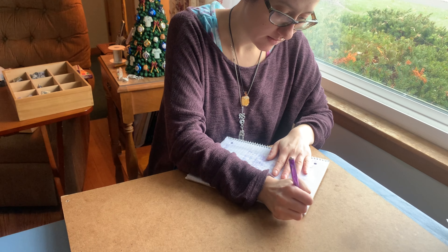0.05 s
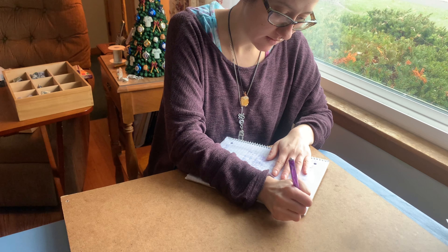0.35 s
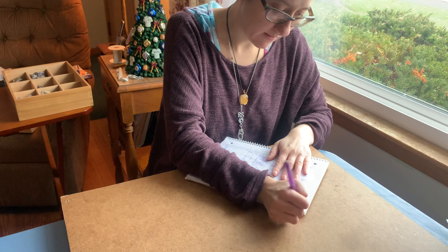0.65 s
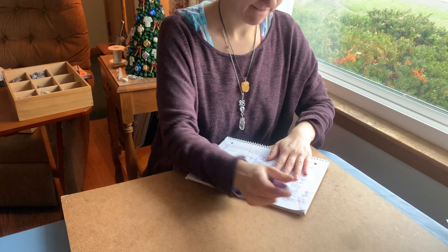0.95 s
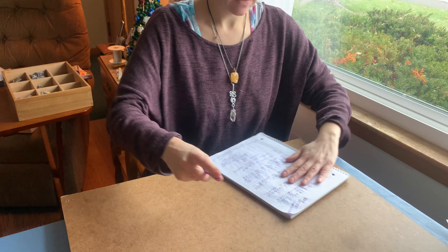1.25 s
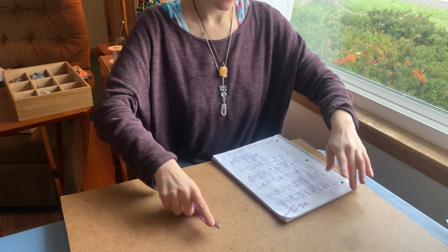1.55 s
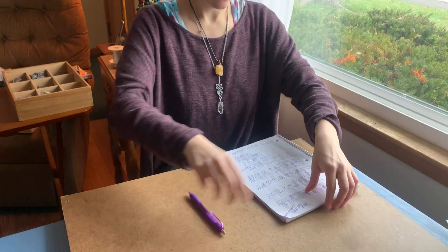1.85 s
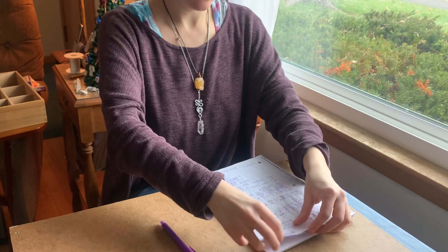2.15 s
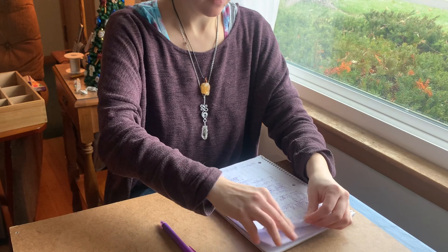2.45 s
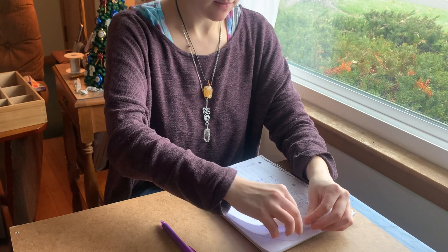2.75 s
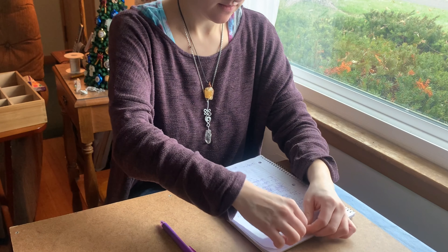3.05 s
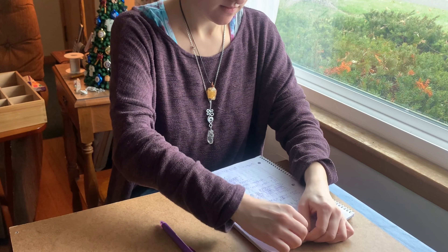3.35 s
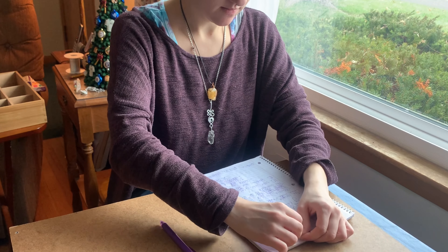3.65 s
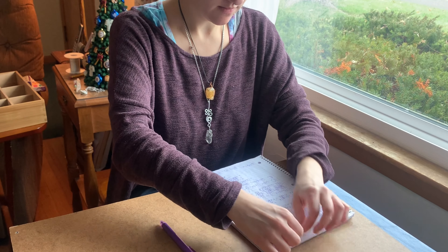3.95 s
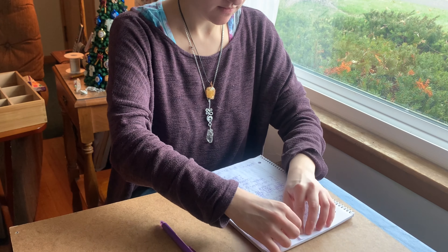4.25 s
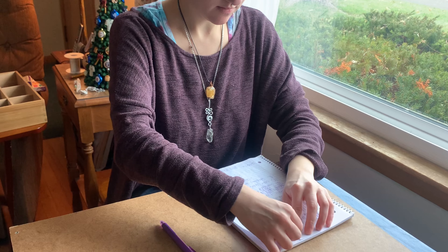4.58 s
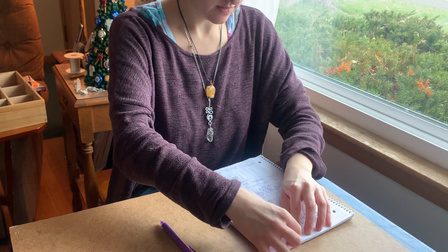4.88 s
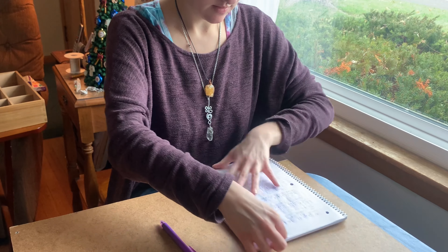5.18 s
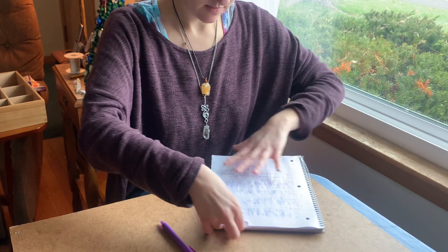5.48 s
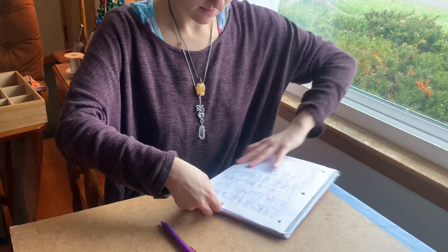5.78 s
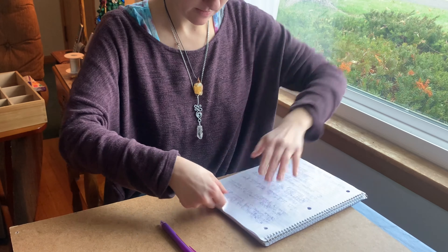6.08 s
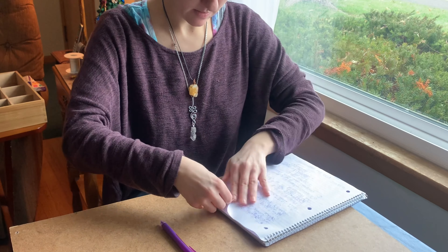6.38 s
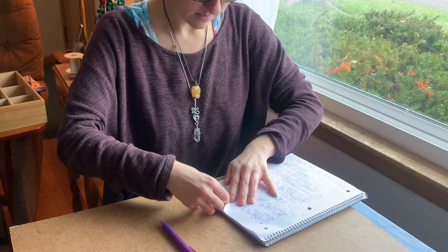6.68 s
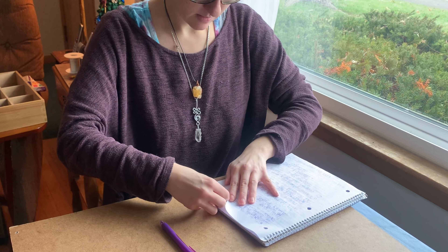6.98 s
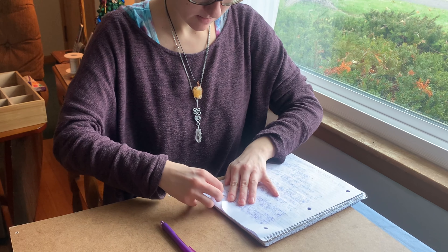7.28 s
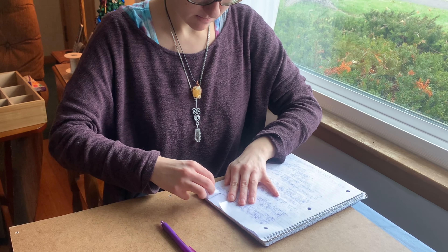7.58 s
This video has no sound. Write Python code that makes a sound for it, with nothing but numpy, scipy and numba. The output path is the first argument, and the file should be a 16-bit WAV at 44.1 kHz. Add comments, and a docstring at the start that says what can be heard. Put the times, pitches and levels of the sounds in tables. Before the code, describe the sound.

A hand swishes over paper and a pen clatters down on wood, followed by light crinkling, a sliding notebook and small, hesitant rips.

```python
"""Spiral notebook on a wooden table

In a quiet room, fingertips tap and brush the page and a hand swishes over it. Something like a pen
clicks, then clatters down and rings the table top. The sheet is picked at and crinkled, the notebook
is slid round, and the sheet is torn a little at a time. Rubbing, buckling and tearing are noise driven
by random slips; snaps, clicks and knocks are short, shaped bursts of noise."""
import sys
import numpy as np
from scipy import signal
from scipy.fft import rfft, irfft
from scipy.io import wavfile
from numba import njit

SR = 44100
rng = np.random.default_rng(int(sys.argv[2]) if len(sys.argv) > 2 else 0)


def file_out(sig):
    """Save sig as 16-bit WAV at sys.argv[1]."""
    # one column per channel
    cols = np.atleast_2d(sig).T
    # limit, then scale
    lim = np.clip(cols, -1, 1)
    pcm = np.round(lim * 32767).astype(np.int16)
    wavfile.write(sys.argv[1], SR, pcm)


N = 336483
TIME = np.arange(N) / SR


def from_db(db):
    """Decibels to gain."""
    return 10 ** (np.asarray(db) / 20)


def rms_one(x):
    """Scale to unit power."""
    return x / np.sqrt(np.mean(x ** 2) + 1e-20)


def to_peak(x, db):
    """Scale the highest crest to db."""
    return from_db(db) * x / np.abs(x).max()


def at_hz(points, hz):
    """Read a table on a log-frequency axis."""
    knots, values = np.transpose(points)
    return np.interp(np.log(np.maximum(hz, 1)), np.log(knots), values)


def band(x, low_hz, high_hz, order=3):
    """Butterworth band-pass."""
    sos = signal.butter(order, [low_hz, min(high_hz, .47 * SR)], "band", fs=SR, output="sos")
    return signal.sosfilt(sos, x + 1e-18)


def colour(x, points, size=4096):
    """Minimum-phase filter with the given (Hz, dB) spectrum."""
    hz = np.arange(size // 2 + 1) * SR / size
    cepstrum = irfft(np.log(from_db(at_hz(points, hz))))
    cepstrum[1:size // 2] *= 2
    cepstrum[size // 2 + 1:] = 0
    return signal.fftconvolve(x, irfft(np.exp(rfft(cepstrum))))[:len(x)]


@njit
def resonate(x, hz, width_hz):
    """Unity-gain resonance with a moving centre."""
    out, r = np.zeros(len(x)), np.exp(-np.pi * width_hz / SR)
    for i in range(2, len(x)):
        drive = (1 - r * r) / 2 * (x[i] - x[i - 2])
        out[i] = drive + 2 * r * np.cos(2 * np.pi * hz[i] / SR) * out[i - 1] - r * r * out[i - 2]
    return out


def drift(per_s):
    """Smooth random wander, spread about 1."""
    knots = rng.standard_normal(N // 20)
    return np.interp(TIME * per_s, np.arange(len(knots)), knots)


def add(out, start_s, piece):
    """Mix a short sound in at start_s."""
    start = max(round(start_s * SR), 0)
    out[start:start + len(piece)] += piece[:N - start]


def burst(crack_s, ring_s, ring_db, rise_s, size=4000):
    """A sudden release of tiny clicks: noise with a fast decay plus a longer shiver."""
    t = np.arange(size) / SR
    decay = np.exp(-t / crack_s) + from_db(ring_db) * np.exp(-t / ring_s)
    return rng.standard_normal(size) * (1 - np.exp(-t / rise_s)) * decay


def slips(per_s, spread_db, slip_s, hiss_share):
    """Random slips of uneven size, each a brief shower of ticks, over steady hiss."""
    sizes = from_db(spread_db * np.minimum(rng.exponential(1, N), 2.6))
    impulses = (rng.random(N) < per_s / SR) * sizes
    power = signal.lfilter([1], [1, -np.exp(-2 / (slip_s * SR))], impulses ** 2 + 1e-18)
    return rng.standard_normal(N) * np.sqrt(power / power.mean() + hiss_share)


def facets(x, patchy_db, per_s):
    """The facets of a bending sheet favour now one band, now another."""
    edges_hz = np.geomspace(400, 18000, 15)
    return sum(band(x, low, high, order=2) * from_db(patchy_db * drift(per_s)) * (-1) ** k
               for k, (low, high) in enumerate(zip(edges_hz, edges_hz[1:])))


def air_pocket(x, glide, width_hz, lift_db):
    """Trapped air adds a hollow ring that glides as the gap changes."""
    hz = np.interp(TIME, *np.transpose(glide))
    return x + from_db(lift_db) * resonate(x, hz, float(width_hz))


# Zones of the sheet: flex, body, fibre ticks. Each row: low edge in Hz, high edge in Hz.
ZONES_HZ = [(500, 2200), (2200, 6500), (6500, 17000)]

def zoned(x, gains):
    """Split into three zones of unit power and mix them by gains."""
    return sum(gain * rms_one(band(x, low, high)) for gain, (low, high) in zip(gains, ZONES_HZ))


def balance(bright_db, flex_db, trade):
    """Zone gains. Brightness is ticks over body; trade times that comes off the flex."""
    return from_db([flex_db - trade * bright_db, 0 * bright_db, bright_db])


def stroke(start_s, length_s, rise_s, release_s, sag_db_per_s):
    """Envelope of one hand movement: swell, sag, release."""
    t = TIME - start_s
    swell = np.sin(np.pi / 2 * np.clip(t / rise_s, 0, 1)) ** 2
    sag = from_db(-sag_db_per_s * np.clip(t - rise_s, 0, length_s))
    release = np.exp(-np.clip((t - length_s) / release_s, 0, 20))
    return swell * sag * release


def pulls(rows, flex_db, trade, **shape):
    """Zone gains over time for a run of short efforts on the sheet; their powers add."""
    power = 0
    for start_s, length_s, db, bright_db in rows:
        level = from_db(db) * stroke(start_s, length_s, **shape)
        power = power + (balance(bright_db, flex_db, trade)[:, None] * level) ** 2
    return np.sqrt(power)


# Finger squeezes. Each row: start in s, length in s, relative level in dB, brightness in dB.
SQUEEZES = [(2.505, 0.13, -59, -13), (2.64, 0.16, -59, -6.5), (2.82, 0.088, -59, -11.5),
            (2.94, 0.11, -61, -14), (3.14, 0.11, -66, -20), (3.28, 0.052, -63.5, 3),
            (3.43, 0.051, -60.5, 13.5), (3.49, 0.053, -56, -4), (3.55, 0.12, -54, 0.5),
            (3.68, 0.058, -66.5, -19), (3.768, 0.032, -56, -3), (3.83, 0.014, -62, -9),
            (3.91, 0.035, -71.5, -19), (4.02, 0.058, -66, -12), (4.075, 0.1, -47.5, -2),
            (4.2, 0.063, -58, -6), (4.3, 0.048, -66, -14), (4.43, 0.016, -64, -13), (4.515, .11, -62, 1.5),
            (4.67, .04, -60.5, -2), (4.715, 0.042, -54.5, 1.5), (4.78, 0.1, -63.5, -2),
            (4.965, 0.014, -68.5, -46)]
# Buckling paper. Each row: frequency in Hz, gain in dB.
CRINKLE_EQ = [(400, -11.5), (950, -7), (1250, -7.5), (1800, -5), (2800, 1.5), (3900, 6), (4900, 4.5),
              (5700, -1), (7400, -6.5), (9700, -5), (12000, -8), (14500, -1.5), (16000, -19.5)]

def crinkling():
    """The squeezed sheet buckles in sparse, uneven slips."""
    crackle = slips(per_s=260, spread_db=4, slip_s=0.0013, hiss_share=0.3)
    crackle = facets(crackle, patchy_db=2.8, per_s=60)
    effort = pulls(SQUEEZES, flex_db=-11.5, trade=0.36, rise_s=0.0077, release_s=0.012,
                   sag_db_per_s=13.5)
    return from_db(2.13) * zoned(colour(crackle, CRINKLE_EQ), effort)


# Each row: start in s, relative peak in dB, brightness in dB.
PAPER_TICKS = [(0.183, -54, 8), (0.347, -48.5, 9), (0.514, -46, 9), (0.53, -45.5, -1.5), (0.546, -47, 7),
               (0.79, -45.5, 14), (2.091, -52, -9), (2.365, -36, -9.5), (2.596, -42, -31),
               (2.635, -33.5, -7), (2.725, -29, -8), (3.059, -20.5, -9), (3.147, -42.5, -18),
               (3.192, -33.5, -11), (3.254, -33, -16), (3.272, -36.5, -6), (3.325, -31, 2.5),
               (3.433, -37.5, 10), (3.468, -34.5, 3), (3.498, -42.5, -10), (3.557, -33, 0),
               (3.636, -35, -6), (4.003, -51, -11.5), (4.053, -37, -11), (4.081, -43.5, -34),
               (4.312, -48, -12), (4.672, -43.5, -2), (5.264, -32, -8.5), (5.301, -33.5, -1),
               (5.605, -41.5, -15), (6.417, -36.5, 16), (6.431, -32, 6), (6.471, -40, 9),
               (7.069, -29.5, -1.5), (7.17, -32, 3.5), (7.375, -44, -4)]

def paper_ticks():
    """Light finger taps on the page, then sharp paper snaps, some dull, some bright."""
    out = np.zeros(N)
    for start_s, peak_db, bright_db in PAPER_TICKS:
        tick = burst(crack_s=0.0015, ring_s=0.0029, ring_db=4.5, rise_s=0.00062)
        tick = zoned(colour(tick, CRINKLE_EQ), balance(bright_db, flex_db=-12.5, trade=0.62))
        add(out, start_s + 0.0004, to_peak(tick, peak_db))
    return from_db(3.2) * out


# Each row: start in s, length in s, relative level in dB, brightness in dB.
TEAR_PULLS = [(6.268, 0.11, -59.5, 5), (6.395, 0.037, -56, 3), (6.47, 0.086, -56, -2),
              (6.635, 0.024, -63.5, -4), (6.735, 0.086, -68, 0), (6.85, .07, -63, 3),
              (6.95, 0.099, -63, -6.5), (7.015, 0.21, -55.5, -8.5), (7.095, 0.055, -47, -5),
              (7.175, 0.064, -54, -3.5), (7.25, .14, -50.5, -2), (7.4, 0.28, -53, -4.5),
              (7.585, 0.059, -51.5, -3)]
# Parting fibres. Each row: frequency in Hz, gain in dB.
TEAR_EQ = [(500, -15), (960, -15), (1200, 2.5), (2300, -6.5), (2900, -1), (4300, 1.5), (4650, -3.5),
           (5000, 4), (5600, -4.5), (6400, -0.5), (7200, -7), (10000, -7), (14000, -5), (16000, -14)]
# Air pocket under the sheet. Each row: time in s, pitch in Hz.
TEAR_GLIDE = [(6.3, 3200), (7.0, 4040), (7.15, 4170), (7.3, 3060), (7.45, 2930), (7.63, 2120)]
# Loose flap. Each row: ratio to the pocket's pitch, gain in dB.
FLAP_MODES = [(.53, -2), (.8, -13), (1.25, -1)]

def tearing():
    """Fibres part in uneven runs; air pocket and flap ring hollow, rising, then sinking in pitch."""
    rasp = slips(per_s=300, spread_db=3.6, slip_s=0.0016, hiss_share=0.3)
    rasp = facets(rasp, patchy_db=2.2, per_s=35)
    pocket_hz = np.interp(TIME, *np.transpose(TEAR_GLIDE))
    flap = sum(from_db(db) * resonate(rasp, ratio * pocket_hz, width_hz=70.0)
               for ratio, db in FLAP_MODES)
    hollow = air_pocket(colour(rasp, TEAR_EQ), TEAR_GLIDE, width_hz=150, lift_db=3)
    effort = pulls(TEAR_PULLS, flex_db=-19.5, trade=0.66, rise_s=0.01, release_s=0.015, sag_db_per_s=22)
    return from_db(1.3) * zoned(hollow + flap, effort)


# Each row: start in s, rise in s, length in s, body level in dB, initial brightness in dB.
HAND_STROKES = [(0.934, 0.2, 0.4, -37.5, -7), (2.114, 0.024, 0.026, -62.5, -7),
                (2.16, 0.056, 0.1, -44.5, -11), (2.268, 0.06, 0.16, -50.5, -3),
                (5.936, 0.095, 0.13, -84, 16.5)]
# Skin on paper. Each row: frequency in Hz, gain in dB.
SWISH_EQ = [(400, -7), (1200, 0.5), (1900, 1.5), (2600, -4.5), (3300, -1.5), (4500, -5), (5000, -2.5),
            (6800, -3.5), (7800, -15), (8400, -4.5), (9500, -9), (16000, -13)]
# Air pocket under the hand. Each row: time in s, pitch in Hz.
SWISH_GLIDE = [(0.98, 3500), (1.1, 3950), (1.17, 4240), (1.321, 3620), (2.18, 3800), (2.22, 2690),
               (2.269, 2700), (2.331, 4200)]

def swishing(brighten_db_per_s=24):
    """Dense slips of skin on paper merge into a hiss that thins as the hand slows and lifts."""
    hiss = colour(slips(per_s=1500, spread_db=1, slip_s=0.0017, hiss_share=0.72), SWISH_EQ)
    hiss = air_pocket(hiss, SWISH_GLIDE, width_hz=700, lift_db=11.5)
    gains = 0
    for start_s, rise_s, length_s, db, bright_db in HAND_STROKES:
        thinning_db = brighten_db_per_s * np.clip(TIME - start_s - rise_s, 0, length_s)
        level = from_db(db) * stroke(start_s, length_s, rise_s, release_s=0.03, sag_db_per_s=70)
        gains = gains + level * balance(bright_db + thinning_db, flex_db=-11.5, trade=-0.3)
    return zoned(hiss, gains)


# Each row: start in s, peak in dB.
CATCH_TICKS = [(1.3876, -15.5), (1.3907, -6.5), (1.394, -19)]
# Plastic catch. Each row: frequency in Hz, gain in dB.
CLICK_EQ = [(100, -44.5), (450, -13), (2000, -10.5), (2900, -1), (4300, -12.5), (5800, -6), (7000, -13.5),
            (9000, 0), (9800, -6.5), (12500, -6.5), (14200, -1), (16000, 2.5)]

def pen_click():
    """A small plastic catch lets go in three quick, bright ticks."""
    out = np.zeros(N)
    for start_s, peak_db in CATCH_TICKS:
        tick = burst(crack_s=0.00038, ring_s=0.002, ring_db=-17, rise_s=0.00081)
        add(out, start_s, to_peak(colour(tick, CLICK_EQ), peak_db))
    return out


# Each row: start in s, crack peak in dB, brightness in dB, relative table peak in dB.
PEN_BOUNCES = [(1.551, -17.5, -6, -27.5), (1.5645, -20.5, -9.5, -31), (1.605, -24, -12.5, -29),
               (1.655, -28, -18.5, -30.5), (1.702, -28, -16.5, -31), (1.767, -37, -43, -36.5),
               (1.795, -44, -15, -41), (1.84, -47, -52, -39), (1.867, -44, -25, -36.5),
               (1.887, -21, 1, -46), (1.903, -27.5, -10, -37.5), (1.919, -36, -15, -47),
               (1.987, -42.5, -2, -75)]
# Pen crack and wood thud. Each row: frequency in Hz, gain in dB.
PEN_EQ = [(400, 2), (1500, 3), (2200, -2.5), (4400, -7.5), (5800, -13), (7400, -5.5), (9000, -8),
          (11000, -12), (16000, -25)]
THUD_EQ = [(25, -68), (60, -23.5), (110, -9), (160, -24), (260, -0.5), (380, 1.5), (700, 0.5), (1100, -27),
           (2000, -24), (5000, -53.5)]

def pen_clatter():
    """The pen lands, bounces and rocks: each contact cracks, and the wood thuds and rings."""
    cracks, thuds = np.zeros((2, N))
    for start_s, peak_db, bright_db, table_db in PEN_BOUNCES:
        rise_s = 0.00032 * from_db(-bright_db / 2)  # dull contacts build more slowly
        crack = burst(crack_s=0.0018, ring_s=0.013, ring_db=-5.5, rise_s=rise_s)
        crack = zoned(colour(crack, PEN_EQ), balance(bright_db, flex_db=-3.5, trade=0.82))
        add(cracks, start_s, to_peak(crack, peak_db))
        thud = burst(crack_s=0.0057, ring_s=0.014, ring_db=-13, rise_s=0.008)
        add(thuds, start_s, to_peak(colour(thud, THUD_EQ), table_db))
    blows = [(start_s, table_db) for start_s, _, _, table_db in PEN_BOUNCES]
    ring = table_ring(blows, contact_s=0.00052, uneven_db=6.5)
    return cracks + from_db(1.8) * thuds + from_db(-2.5) * ring


# Each row: frequency in Hz, relative level in dB, T60 in s.
TABLE_MODES = [(201, -16, 0.25), (296, 3, 0.073), (372, 5.5, 0.22), (431, 3, 0.14), (500, -14, 0.13),
               (582, -20, 0.23), (612, -20, 0.26), (743, -6.5, 0.25), (860, 4, 0.19), (910, -35, 0.19),
               (992, -1.5, .15), (1200, -5, 0.26), (1420, -9, 0.11), (1410, -24.5, 0.25)]

def table_ring(blows, contact_s, uneven_db):
    """Each blow rings the table top's modes; random strengths stand for where it lands."""
    out, t = np.zeros(N), np.arange(SR // 2) / SR
    hz, mode_db, t60_s = np.transpose(TABLE_MODES)[:, :, None]
    for start_s, peak_db in blows:
        scatter, polarity = rng.standard_normal((2, len(TABLE_MODES), 1))
        strength = from_db(mode_db + uneven_db * scatter) * np.sign(polarity)
        strength /= 1 + (hz * contact_s) ** 4  # long contact leaves high modes still
        modes = strength * np.sin(2 * np.pi * hz * t) * from_db(-60 * t / t60_s)
        add(out, start_s, to_peak(modes.sum(axis=0), peak_db))
    return out


# Notebook speed. Each row: time in s, relative hiss level in dB.
SLIDE_SPEED = [(5.0, -79), (5.224, -51.5), (5.308, -52.5), (5.344, -58), (5.616, -60), (5.706, -50.5),
               (5.842, -52.5), (5.91, -63), (5.952, -83), (5.97, -80)]
# Card on wood. Each row: frequency in Hz, gain in dB.
SLIDE_EQ = [(400, -5), (700, -3), (1300, -3.5), (1800, -4), (2600, -8.5), (3900, -1.5), (5800, -2.5),
            (6700, -1), (7600, -5), (9000, -1), (11500, -3), (16000, -4.5)]

def sliding():
    """Card slides over wood with a hiss that follows its speed."""
    hiss = slips(per_s=1500, spread_db=4, slip_s=0.0014, hiss_share=1)
    hiss = colour(facets(hiss, patchy_db=3.5, per_s=18), SLIDE_EQ)
    speed_db = np.interp(TIME, *np.transpose(SLIDE_SPEED), left=-np.inf, right=-np.inf)
    return from_db(speed_db + 0.5) * zoned(hiss, balance(bright_db=-0.5, flex_db=-8.5, trade=0))


# Each row: start in s, peak in dB.
FINGER_TOUCHES = [(0.16, -58.5), (0.326, -59.5), (0.346, -59), (0.424, -67.5), (0.526, -51), (0.729, -55.5),
                  (0.886, -56)]
# Fingertips on paper. Each row: frequency in Hz, gain in dB.
BRUSH_EQ = [(500, -8), (2050, -3.5), (2500, 8), (3000, 4), (4300, -3), (7000, -10), (16000, -8.5)]

def brushing():
    """Light touches on the sheet swell and fade within hundredths of a second."""
    out = np.zeros(N)
    for start_s, peak_db in FINGER_TOUCHES:
        touch = burst(crack_s=0.0095, ring_s=0.024, ring_db=-12, rise_s=0.054)
        add(out, start_s, to_peak(colour(touch, BRUSH_EQ), peak_db))
    return out


# Each row: start in s, relative peak in dB.
HAND_BUMPS = [(0.057, -56), (0.323, -49.5), (0.359, -55), (0.434, -46), (0.45, -53), (0.502, -39),
              (0.518, -51), (3.06, -47.5), (4.81, -52.5), (4.974, -51), (5.44, -47), (5.778, -43),
              (6.499, -55.5), (6.899, -61), (7.078, -59)]

def bumping():
    """A soft hand thuds on the table and stirs mainly its low modes; the row at 3.06 s instead gives the paper
    snap there its low body."""
    thuds = np.zeros(N)
    for start_s, peak_db in HAND_BUMPS:
        thud = colour(burst(crack_s=0.0021, ring_s=0.028, ring_db=-8, rise_s=0.0054), THUD_EQ)
        add(thuds, start_s, to_peak(band(thud, 67, 436), peak_db))
    ring = table_ring(HAND_BUMPS, contact_s=0.0014, uneven_db=1.5)
    return from_db(-5) * thuds + from_db(-4.5) * ring


# Each row: start in s, length in s, level in dB.
DRAG_STROKES = [(0.706, 0.28, -65), (0.963, 0.31, -61), (2.445, 2.2, -73), (4.637, 0.35, -71.5),
                (4.93, 0.65, -69.5), (5.55, 0.31, -63), (6.46, 0.091, -67.5), (6.82, 0.57, -77)]
# Rubbed table top. Each row: frequency in Hz, gain in dB.
DRAG_EQ = [(30, -29.5), (70, 2.5), (110, -11.5), (170, -18), (240, -6), (315, -3), (450, -5.5),
           (700, -14.5), (1500, -28.5)]

def dragging():
    """Hands and notebook drag in slow slips that make the table top murmur."""
    murmur = colour(slips(per_s=120, spread_db=2.5, slip_s=0.008, hiss_share=0.7), DRAG_EQ)
    weight = sum(from_db(db) * stroke(start_s, length_s, rise_s=0.077, release_s=0.03, sag_db_per_s=2.4)
                 for start_s, length_s, db in DRAG_STROKES)
    return rms_one(murmur) * weight


# Each row: frequency in Hz, T60 in s.
TAIL_T60 = [(200, 0.79), (800, 0.21), (2500, 0.37), (6000, 0.23), (15000, 0.18)]
# Each row: frequency in Hz, tail gain in dB.
TAIL_EQ = [(200, -4), (1000, -6), (4000, -8), (14000, -7)]

def room(x, echo_s=0.000691, echo_gain=0.04, onset_s=0.0021):
    """Furnished room: one echo off the table, then a diffuse tail that lasts longest in the bass."""
    t, edges_hz = np.arange(SR // 2) / SR, 100 * 2 ** np.arange(0, 8, 0.7)
    tail = 0
    for low, high in zip(edges_hz, edges_hz[1:]):
        hz = np.sqrt(low * high)
        fade = from_db(-60 * t / at_hz(TAIL_T60, hz)) * (1 - np.exp(-(t / onset_s) ** 2))
        noise = band(rng.standard_normal(len(t)), low, high)
        tail = tail + from_db(at_hz(TAIL_EQ, hz)) * noise * fade / np.linalg.norm(fade)
    echo = echo_gain * np.interp(TIME - echo_s, TIME, x)
    return x + echo + signal.fftconvolve(x, tail)[:N]


# Noise floor. Each row: frequency in Hz, gain in dB.
FLOOR_EQ = [(25, -27), (45, -36), (75, 8.5), (120, 5), (170, -2.5), (380, -6), (700, -11.5), (1000, -16),
            (2500, -23), (4000, -24), (8000, -28), (16000, -31.5)]

def background(floor_db=-69, hum_hz=55.6, hum_db=-71):
    """Faint rumble and hiss, with a low wavering hum."""
    air = rms_one(colour(rng.standard_normal(N), FLOOR_EQ))
    hum = rms_one(np.sin(2 * np.pi * hum_hz * TIME + 0.56 * drift(16)) * from_db(3.6 * drift(5.8)))
    return from_db(floor_db) * air + from_db(hum_db) * hum


def scene():
    """Paper, pen and table in one room, the same in both channels."""
    paper = swishing() + sliding() + brushing() + crinkling() + tearing() + paper_ticks()
    sound = room(paper + dragging() + pen_click() + pen_clatter() + bumping()) + background()
    return np.array([sound, sound])


def record(dry):
    """The microphone loses the deepest bass; the top is cut steeply."""
    low_hz, high_hz = 40, 16500
    heard = signal.sosfilt(signal.butter(3, low_hz, "high", fs=SR, output="sos"), dry)
    return signal.sosfilt(signal.ellip(10, 0.2, 80, high_hz, fs=SR, output="sos"), heard)


dry = scene()
out = record(dry)
file_out(out)
```